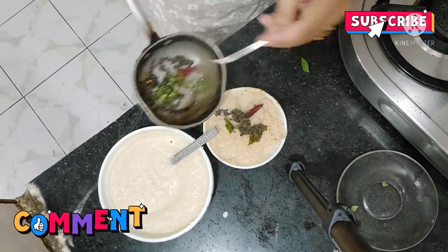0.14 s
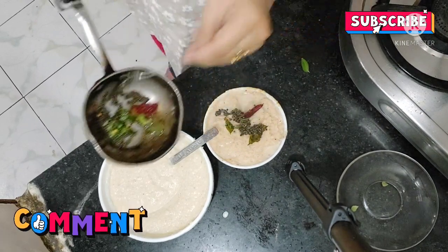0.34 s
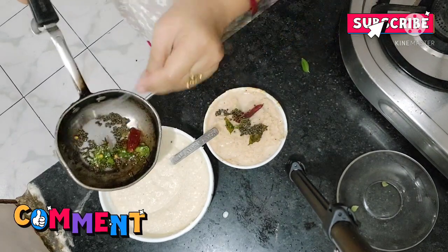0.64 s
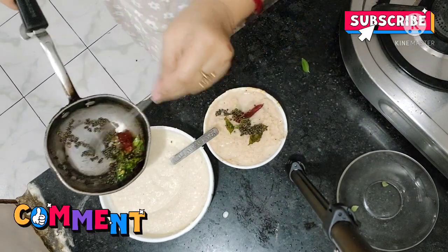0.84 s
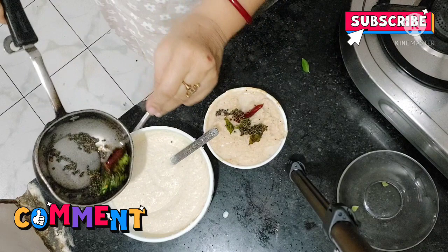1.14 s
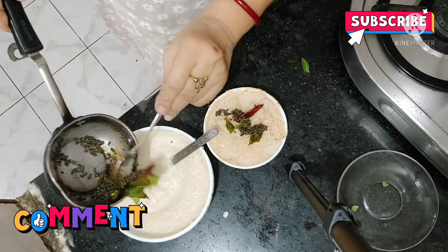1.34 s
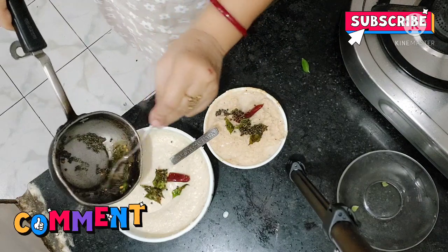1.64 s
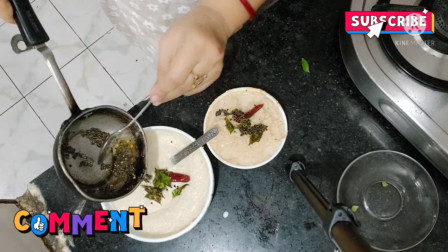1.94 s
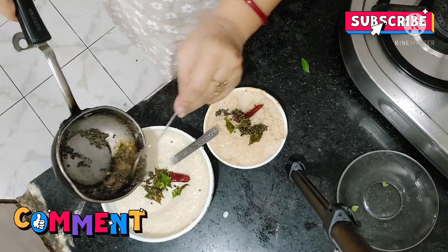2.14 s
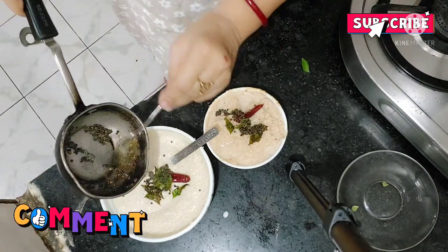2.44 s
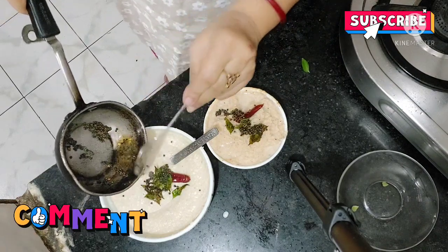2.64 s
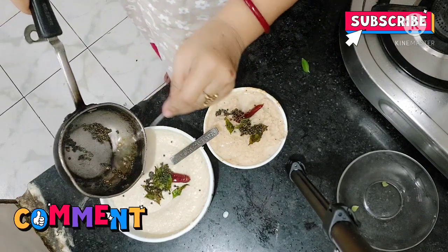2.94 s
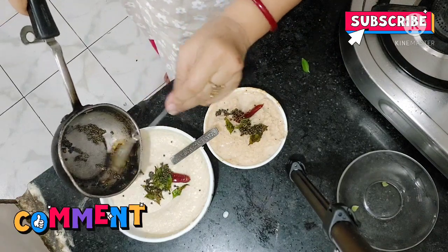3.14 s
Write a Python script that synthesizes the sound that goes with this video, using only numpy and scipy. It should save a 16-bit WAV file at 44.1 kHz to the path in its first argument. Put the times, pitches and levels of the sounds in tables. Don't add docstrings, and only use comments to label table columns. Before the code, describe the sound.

Hot oil with spices sizzles in a small steel pan, bright and crackly; a spoon taps and scrapes the metal in bursts, then drops pop more thickly, close to the microphone in a low-humming kitchen.

```python
import sys
import numpy as np
from scipy import signal
from scipy.fft import rfft, irfft
from scipy.io import wavfile
from scipy.ndimage import uniform_filter1d

SR = 44100
rng = np.random.default_rng(int(sys.argv[2]) if len(sys.argv) > 2 else 0)


def voltage_ratio(decibels):
    exponent = np.asarray(decibels, float) / 20
    return 10 ** exponent


def put_to_file(sound):
    columns = np.atleast_2d(sound).T
    safe = np.clip(columns, -1, 1)
    whole_steps = np.round(safe * 32767)
    wavfile.write(sys.argv[1], SR, whole_steps.astype(np.int16))


N = 145530
t = np.arange(N) / SR


def unit(x):
    return x / np.sqrt(np.mean(x ** 2))


def curve_db(rows):
    return voltage_ratio(np.interp(t, *np.array(rows).T))


def filtered(x, order, edges, kind):
    return signal.sosfilt(signal.butter(order, edges, kind, fs=SR, output="sos"), x)


def colour(x, rows):
    hz, db = np.array(rows).T
    n = 2 ** 13
    log_hz = np.log(np.arange(n // 2 + 1) * SR / n + 1)
    cepstrum = irfft(np.interp(log_hz, np.log(hz), db) * np.log(10) / 20)
    cepstrum[1:n // 2] *= 2
    cepstrum[n // 2 + 1:] = 0
    return signal.fftconvolve(x, irfft(np.exp(rfft(cepstrum))))[:N]


def ring(x, hz, t60):
    pole = np.exp((2j * np.pi * hz - np.log(1000) / t60) / SR)
    return signal.lfilter([1], [1, -pole], x).imag


def walk(rate):
    k = int(SR / rate)
    steps = np.repeat(rng.standard_normal(N // k + 1), k)
    return unit(uniform_filter1d(uniform_filter1d(steps, k), k)[:N])


def clicks(per_s, scatter_db):
    happens = rng.random(N) < per_s / SR
    strength = voltage_ratio(scatter_db * np.minimum(rng.exponential(size=N), np.pi))
    return unit(happens * strength * np.sign(rng.standard_normal(N)))


# t/s, level/dB
FRYING = [(0, -42.5), (.33, -42), (.43, -37.5), (.53, -34.5), (.6, -40), (.85, -41), (1.07, -45),
          (1.11, -37.5), (1.25, -41.5), (1.44, -41), (1.65, -46.5), (1.83, -45), (1.9, -41), (2.19, -42),
          (2.23, -35.5), (2.5, -39.5), (2.63, -36.5), (3.3, -36.5)]
# f/Hz, level/dB per Hz
FRYING_COLOUR = [(700, -25), (2000, -12.5), (4500, -8), (6500, -9.5), (7600, -1.5), (9500, -2.5),
                 (12000, -2.5), (16000, -4.5)]


def sizzle():
    surge_db, flicker_db, spread_db = .5, 2.02, 10
    bursts_per_s, scatter_db = 4000, 4.5
    spits_per_s, spit_db, spit_scatter_db, spit_t60_s = 40, -2.5, 3.0, .004
    level = curve_db(FRYING)
    surge = surge_db * walk(45)
    out = np.zeros((3, N))
    for edges, kind in ((3500, "low"), ((3500, 9000), "band"), (9000, "high")):
        part = np.array([clicks(bursts_per_s, scatter_db) for _ in range(3)])
        part[1:] *= voltage_ratio(spread_db)
        part = filtered(part, 2, edges, kind)
        if kind == "low":
            part *= (level / voltage_ratio(-43.5)) ** .8744
        out += part * voltage_ratio(surge + flicker_db * walk(70))
    spits = np.abs(clicks(spits_per_s, spit_scatter_db))
    fade = signal.lfilter([1], [1, -voltage_ratio(-60 / SR / spit_t60_s)], spits)
    out[0] += voltage_ratio(spit_db) * unit(fade * rng.standard_normal(N))
    return unit(np.array([colour(x, FRYING_COLOUR) for x in out])) * level * voltage_ratio(4.0)


# t/s, peak level/dB, bubble pitch f/Hz
DROPS = [(0.2614, -28, 8700), (1.3713, -23, 10800), (1.4257, -16, 9910), (1.5519, -31, 10200),
         (1.5678, -21, 13400), (1.7719, -24, 8610), (1.8692, -25, 8340), (1.9081, -25, 12300),
         (1.949, -27, 12500), (1.9649, -20, 8690), (1.9929, -25, 8860), (2.0273, -24, 13300),
         (2.1495, -27, 9570), (2.174, -23, 7830), (2.2029, -8, 7720), (2.2694, -23, 10600),
         (2.3174, -22, 10500), (2.3545, -23, 9510), (2.3774, -26, 10800), (2.394, -19, 9530),
         (2.4169, -18, 9600), (2.4514, -22, 8200), (2.6294, -21, 11600), (2.7132, -23, 7390),
         (2.7472, -18, 8670), (2.7796, -22, 11500), (2.7901, -21, 9580), (2.8524, -23, 7740),
         (2.9233, -19, 9790)]


def pops():
    delay_s, gain_db, low_cut_hz = .001207, 1.5, 3000
    t60_s, crack_db, tail_db, tail_t60_s = .004, 5, -13, .03
    out, n = np.zeros(N), SR // 8
    u = t[:n]
    for s, db, hz in DROPS:
        i = int((s + delay_s) * SR)
        chirp = np.sin(2 * np.pi * hz * u) * voltage_ratio(-60 * u / t60_s)
        fade = voltage_ratio(crack_db - 60 * u / t60_s) + voltage_ratio(tail_db - 60 * u / tail_t60_s)
        spray = rng.standard_normal(n) * fade
        out[i:i + n] += voltage_ratio(db + gain_db) * (chirp + .5 * spray)[:N - i]
    return filtered(out, 1, low_cut_hz, "high")


# t/s, bowl level/dB, rim level/dB re bowl, high ring level/dB re bowl, knock f/Hz
SPOON_TAPS = [(0.377, -40.5, -19, 5, 2160), (0.4882, -26.5, 4, -1, 1210), (0.717, -35.5, 2, -8, 3250),
              (0.779, -36, -8, -18, 860), (0.813, -36, -10, 10, 1300), (1.094, -25, 6.5, 11, 1760),
              (1.2455, -31.5, 13.5, -10, 1900), (1.2565, -37, 15, 0, 2690), (1.313, -33, -3, -6, 2500),
              (1.425, -44.5, 11, 17, 2740), (1.64, -50, 17, -5, 790), (1.667, -38.5, 11, 13, 790),
              (1.7285, -38.5, -2, 5, 610), (2.2037, -33.5, 7, 5, 3620), (2.254, -41, 8, -10, 2300),
              (2.354, -43, -11, 7, 1370), (2.586, -51, -13, -10, 2380), (2.71, -40, 7, -9, 850),
              (2.783, -41, -13, -11, 1400), (3.0003, -26, 4, 14, 865), (3.0597, -33.5, 20, 3, 2720),
              (3.122, -37, -3, -12, 2400)]


def taps(push):
    delay_s, knock_db, knock_t60_s = .0003, -1, .03
    knock, u = np.zeros(N), t[:SR // 10]
    for s, db, rim_db, high_db, hz in SPOON_TAPS:
        i = int((s + delay_s) * SR)
        push[:, i] = voltage_ratio(db + np.array([0, rim_db, high_db]))
        knock[i:i + len(u)] += np.sin(2 * np.pi * hz * u) * voltage_ratio(db + knock_db - 60 * u / knock_t60_s)
    return knock


# t/s, bowl level/dB, rim level/dB
EDGE_SLIPS = [(.4935, -21.5, -30), (.5, -27, -25), (.5066, -24, -26), (.5123, -25, -28), (.5174, -27, -24),
              (.5258, -42, -20.5), (.5297, -34, -32), (.5395, -28, -26), (.5472, -46, -37),
              (.5521, -39, -38), (.733, -38, -41), (.7402, -36, -41), (.7705, -30, -41), (.7832, -36, -44),
              (.7866, -29, -43), (.8093, -32, -48), (.8176, -31, -35), (.8221, -29, -38), (.8256, -32, -41),
              (.8303, -34, -33), (.8369, -31, -32), (.8415, -32, -29), (.8458, -27, -27), (.8585, -31, -33),
              (1.0985, -28, -32), (1.1125, -32, -37), (1.1159, -25, -47), (1.1304, -33, -38),
              (1.1451, -26, -24), (1.1492, -29, -22), (1.153, -25, -42), (1.1591, -31, -31),
              (1.1649, -30, -26.5), (1.1688, -30, -30), (1.1733, -44, -24), (1.1774, -29, -27),
              (1.182, -35, -29), (1.1924, -43, -29), (1.2006, -32, -34), (1.2086, -29, -32),
              (1.2624, -29, -32), (1.27, -25, -24), (1.3717, -43, -46), (1.5707, -52, -40),
              (1.695, -44, -35), (1.7344, -42, -45), (1.7447, -35, -52), (2.2085, -40, -26),
              (2.2195, -38, -30), (2.2474, -40, -31), (3.0169, -40, -40), (3.0255, -32, -40),
              (3.0358, -36, -36), (3.0632, -34, -18), (3.0732, -38, -36), (3.0842, -35, -26),
              (3.102, -36, -35)]


def chatter(push):
    for s, bowl_db, rim_db in EDGE_SLIPS:
        push[:, int(s * SR)] = voltage_ratio(np.array([bowl_db - 6.5, rim_db + 2.5, rim_db - 8]))


# t/s, length/s, bowl level/dB, rim level/dB
DRAGS = [(.38, 0.065, -53, -60), (0.497, 0.049, -55, -37), (0.516, 0.082, -48.5, -40),
         (0.605, 0.072, -55, -53), (0.72, 0.035, -56, -53), (0.758, 0.047, -46, -53),
         (0.804, 0.08, -46, -41), (0.86, 0.097, -52, -47), (1.109, 0.04, -40.5, -31),
         (1.139, 0.062, -43, -33), (1.208, 0.045, -44.5, -45), (1.258, 0.15, -49.5, -43),
         (1.68, 0.153, -50.5, -51), (1.823, 0.33, -57.5, -59), (2.215, 0.1, -51.5, -50),
         (2.586, 0.58, -54.5, -62), (3.007, 0.059, -49, -58), (3.064, 0.045, -52, -42),
         (3.114, 0.14, -54.5, -45)]


def scrapes(push):
    slips_per_s, jitter, scatter_db, grit_db = 165, .25, 4.0, -13
    edge_s, high_rub_db = .003, -12
    turns = np.cumsum(slips_per_s * np.exp(jitter * walk(90))) / SR
    slips = np.diff(np.floor(turns), prepend=0)
    rub = unit(slips * voltage_ratio(scatter_db * rng.standard_normal(N)))
    rub += voltage_ratio(grit_db) * rng.standard_normal(N)
    for s, length, bowl_db, rim_db in DRAGS:
        gate = np.clip(np.minimum(t - s, (s + length - t) / 4) / edge_s, 0, 1)
        push += voltage_ratio(np.array([[bowl_db], [rim_db], [rim_db + high_rub_db]]) - 19) * gate * rub


def body(x, modes, wander_db):
    out = np.zeros(N)
    for k, (hz, db, t60) in enumerate(modes):
        out += (-1) ** k * voltage_ratio(db) * ring(x * voltage_ratio(wander_db * walk(35)), hz, t60)
    return out / np.sqrt(len(modes))


# f/Hz, level/dB, t60/s
BOWL_MODES = [(542, -6, 0.049), (618, -4, 0.055), (704, -5.5, 0.035), (850, 3.5, 0.086), (1020, 1, 0.014),
              (1298, 4, 0.032), (1490, 4, 0.048), (1678, 1, 0.022), (1923, 1, 0.037), (2120, 3, 0.046),
              (2390, 2, 0.025), (2820, -3, 0.029), (3140, 0, 0.026)]
# f/Hz, level/dB, t60/s
RIM_MODES = [(4276, -9.5, .03), (4498, -10, 0.058), (4590, -5, 0.087), (4680, -6.5, 0.033),
             (4805, -12, .03), (4564, 5.5, 0.012), (4870, -2, 0.0063)]
# f/Hz, level/dB, t60/s
HIGH_MODES = [(7200, 3, 0.018), (7600, -1.5, 0.02), (7770, -6, .025), (7800, 5, 0.0074)]
# f/Hz, level/dB
CONTACT_CRACK = [(900, 3), (1400, 7), (2100, 7), (3000, 6.5), (3900, 1), (5600, -2.5)]


def spoon():
    contact_db, crack_t60_s, low_cut_hz = 4.5, .0055, 430
    push = np.zeros((3, N))
    pan = taps(push)
    chatter(push)
    scrapes(push)
    for k, (hz, db) in enumerate(CONTACT_CRACK):
        pan += (-1) ** k * voltage_ratio(db) * ring(push[0], hz, crack_t60_s)
    pan += body(push[0], BOWL_MODES, contact_db)
    pan += body(push[1], RIM_MODES, .8 * contact_db)
    pan += body(push[2], HIGH_MODES, contact_db)
    return filtered(pan, 4, low_cut_hz, "high")


def room(struck):
    t60_s, early_s, worktop_db, worktop_t60_s = .19, .0014, 12, .016
    u = t[:SR // 3]
    tiles = voltage_ratio(-60 * u / t60_s) * np.clip(u / early_s, 0, 1)
    worktop = voltage_ratio(worktop_db - 60 * u / worktop_t60_s)
    echo = rng.standard_normal((2, len(u))) * (tiles + worktop)
    echo /= np.sqrt(np.sum(echo ** 2, axis=1, keepdims=True))
    return signal.fftconvolve(struck[None], echo, axes=1)[:, :N]


# f/Hz, level/dB per Hz
AIR_COLOUR = [(24, -59.5), (40, -27.5), (85, -2.5), (147, -22.5), (173, -19.5), (411, -23), (569, -26.5),
              (1680, -33), (3000, -26), (3900, -46), (6600, -120)]
# f/Hz, width/Hz, level/dB
ROOM_BOOM = [(56.5, 6.1, -54.5), (100.1, 36.5, -48.5), (332.1, 7.6, -65)]
# t/s, level/dB
MOTOR_HUM = [
    (0.0, -44.5),
    (0.5, -48),
    (0.75, -42.5),
    (1.18, -58.5),
    (1.3, -79),
    (2.22, -45.5),
    (2.24, -68),
    (3.26, -38.5),
    (3.3, -43),
]


def kitchen():
    air_db, alike_hz, hum_hz = -50, 443, 82.8
    bass_pan_db, boom_side_db = -3.5, -10.5
    opposite = np.array([[1], [-1]])
    mid, side = (unit(colour(rng.standard_normal(N), AIR_COLOUR)) for _ in range(2))
    air = voltage_ratio(air_db) * (mid + filtered(side, 1, alike_hz, "high") * opposite)
    boom = np.zeros(N)
    for hz, width, db in ROOM_BOOM:
        boom += voltage_ratio(db) * unit(ring(rng.standard_normal(N), hz, 2.8 / width))
    boom = boom + voltage_ratio(boom_side_db) * np.roll(boom, N // 2) * opposite
    phase = 2 * np.pi * np.cumsum(hum_hz * (1 + .011 * walk(9.8))) / SR
    hum = np.sqrt(2) * np.sin(phase) * curve_db(MOTOR_HUM)
    return air + (boom + hum) * voltage_ratio(opposite * bass_pan_db / 2)


def scene():
    right_late_s, pan_db, room_db = 1.95e-4, 1.0, -2.5
    fry = sizzle()
    struck = pops() + spoon()
    pan = fry[0] + struck
    hz = np.arange(N // 2 + 1) * SR / N
    late = irfft(rfft(pan) * np.exp(-2j * np.pi * hz * right_late_s), N)
    near = np.array([pan, late]) + fry[1:]
    near *= voltage_ratio(np.array([[.5], [-.5]]) * pan_db)
    return near + voltage_ratio(room_db) * room(struck) + kitchen()


def low_pass(x):
    return signal.sosfilt(signal.butter(12, 16820, fs=SR, output="sos"), x)


def record(dry):
    heard = filtered(dry, 3, 48.3, "high")
    rounded = .7 * np.tanh(heard / .7)
    mix = signal.sosfilt(signal.ellip(10, .3, 60, 15750, fs=SR, output="sos"), rounded)
    return low_pass(mix)


dry = scene()
out = record(dry)
put_to_file(out)
```